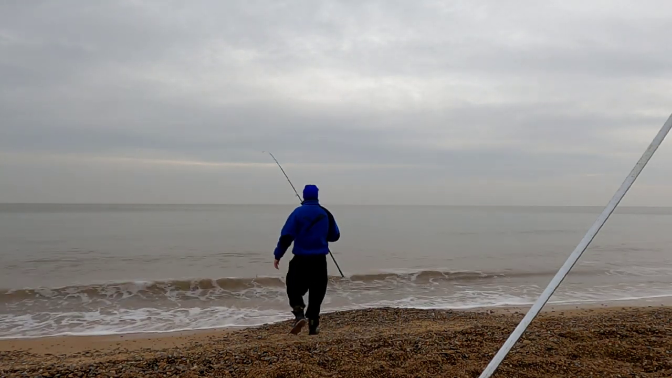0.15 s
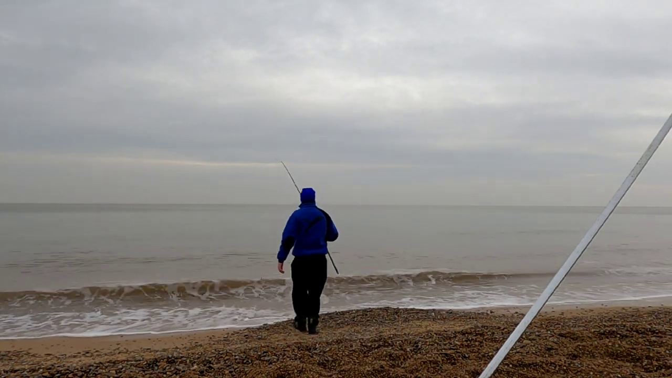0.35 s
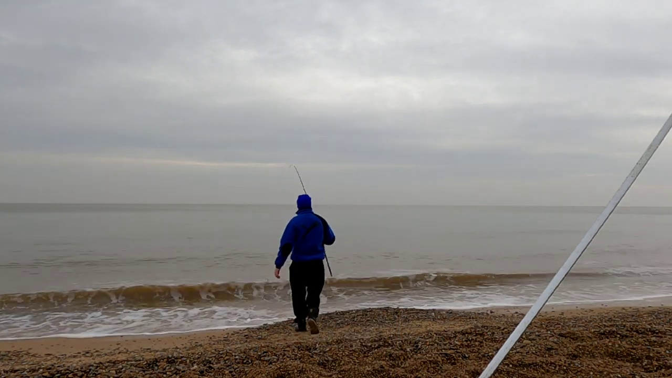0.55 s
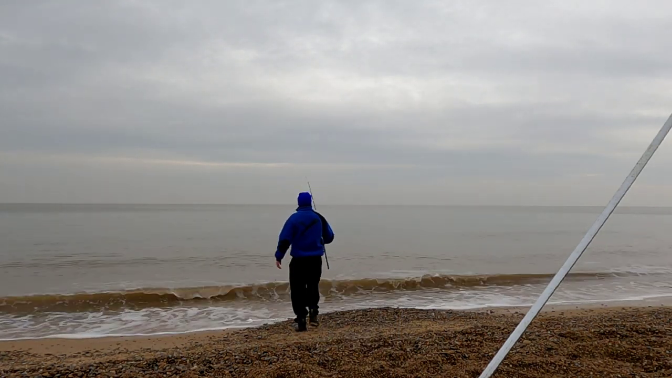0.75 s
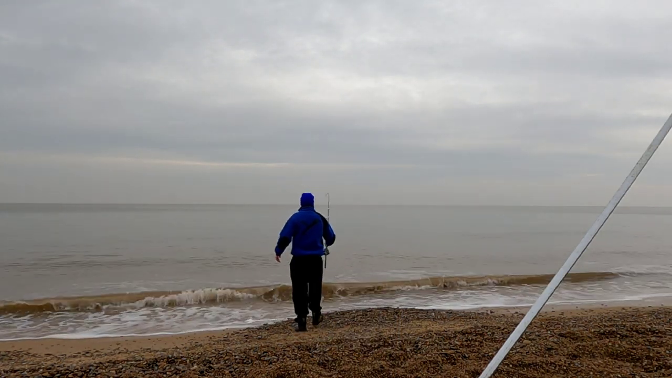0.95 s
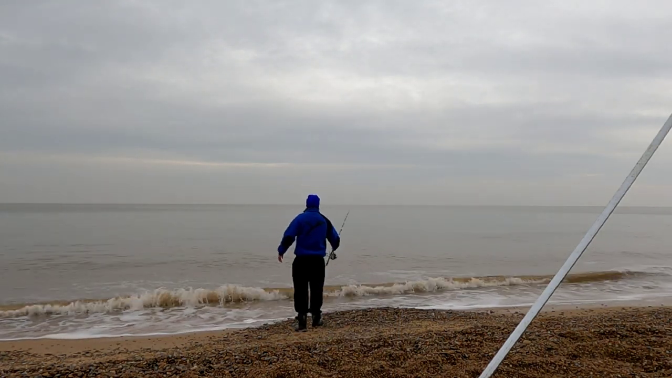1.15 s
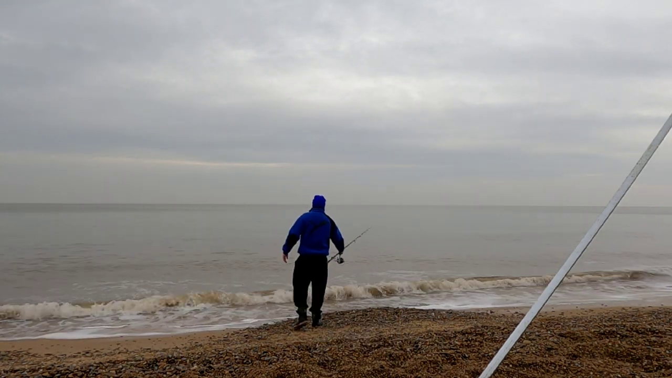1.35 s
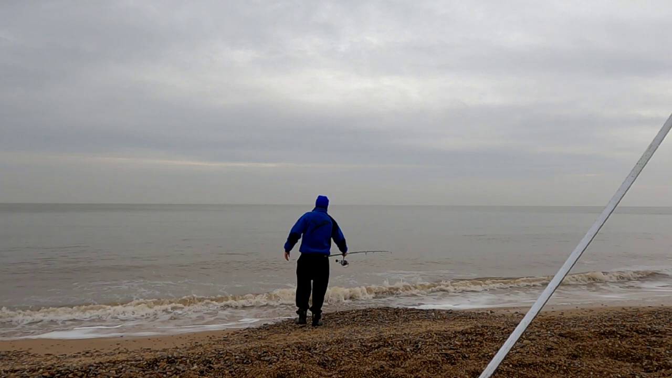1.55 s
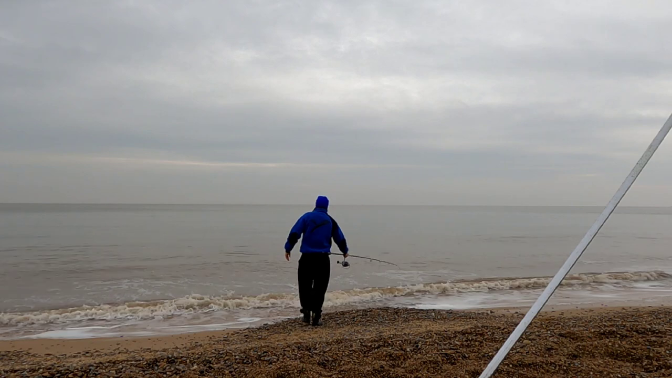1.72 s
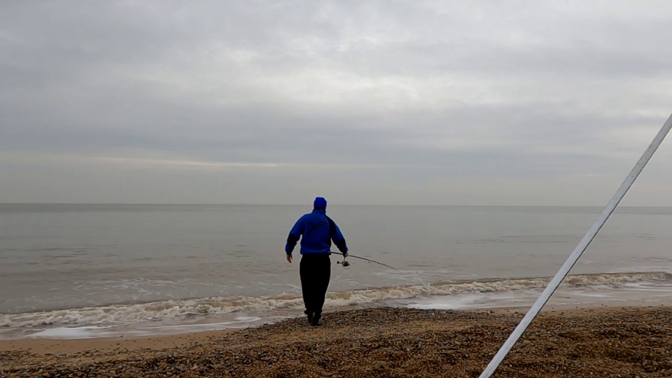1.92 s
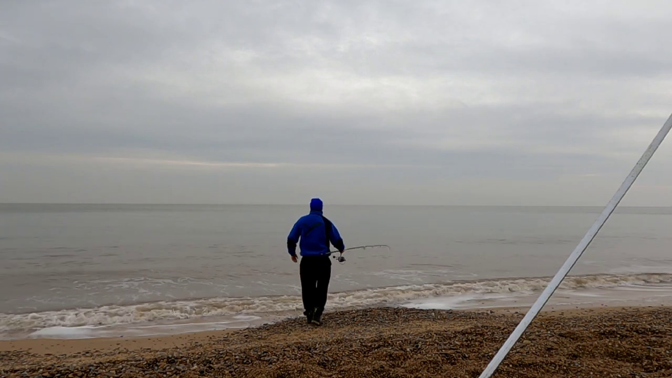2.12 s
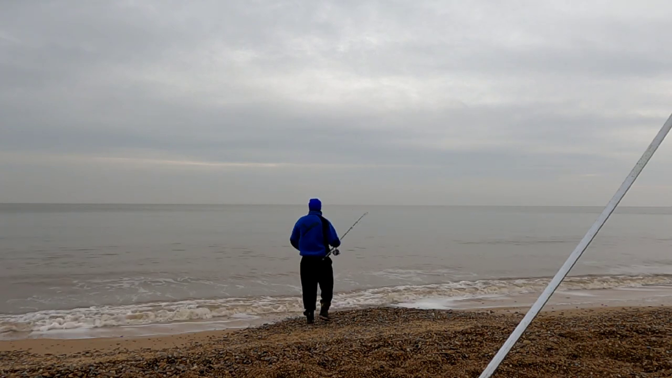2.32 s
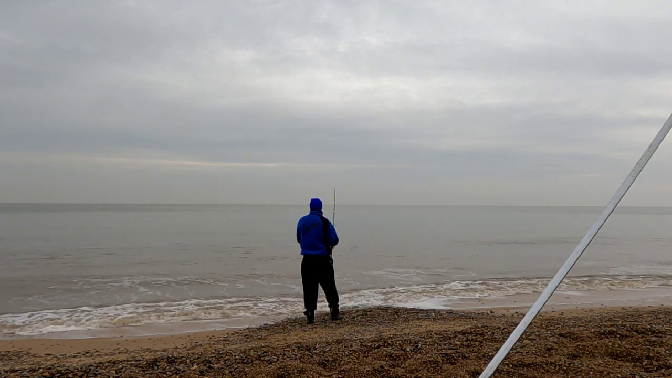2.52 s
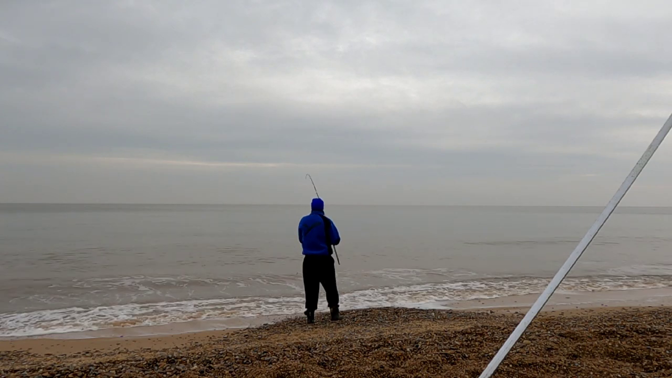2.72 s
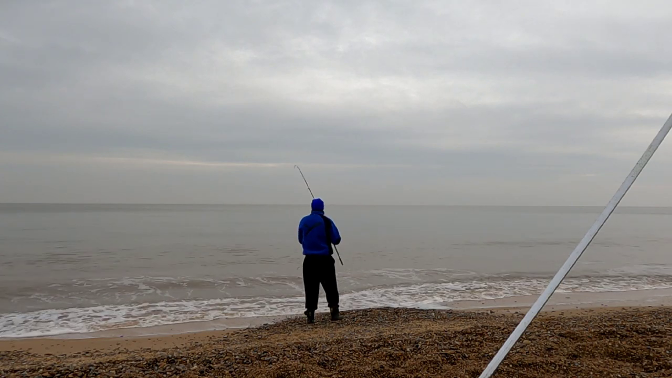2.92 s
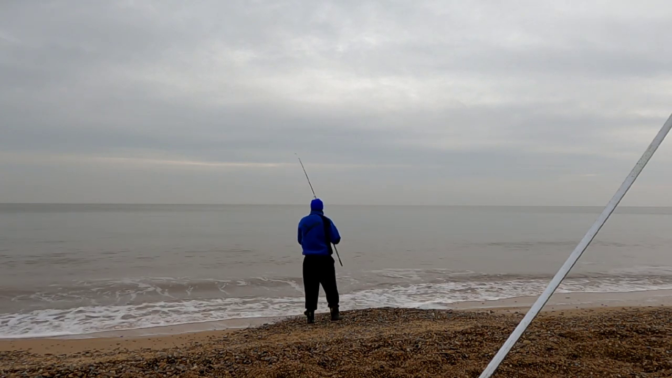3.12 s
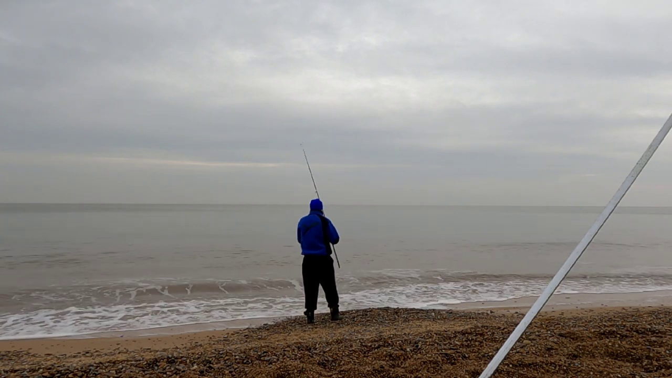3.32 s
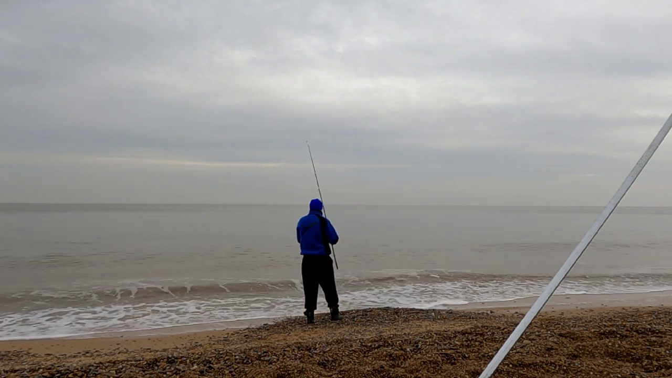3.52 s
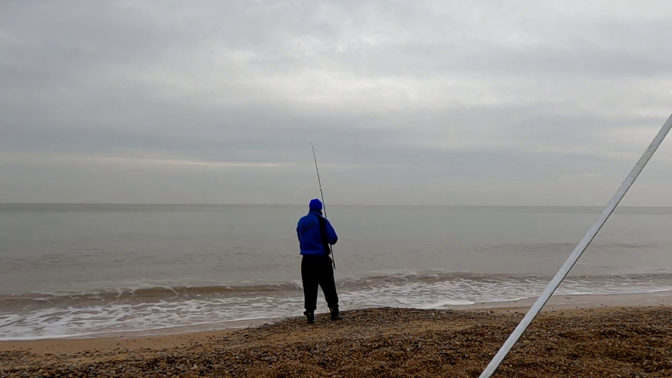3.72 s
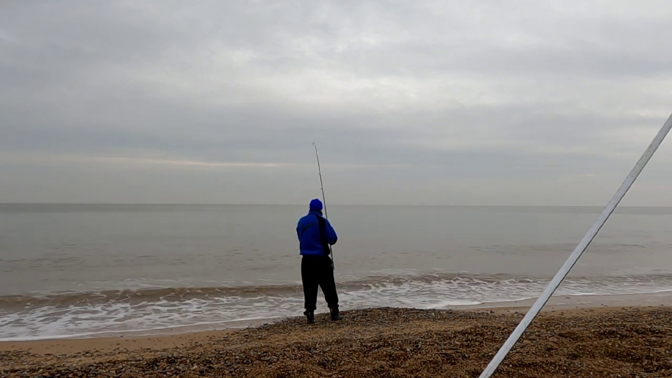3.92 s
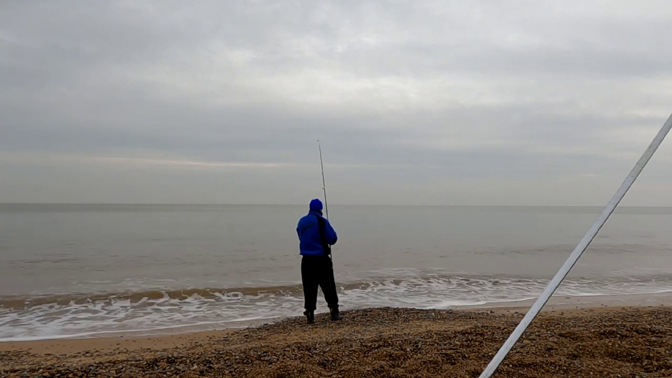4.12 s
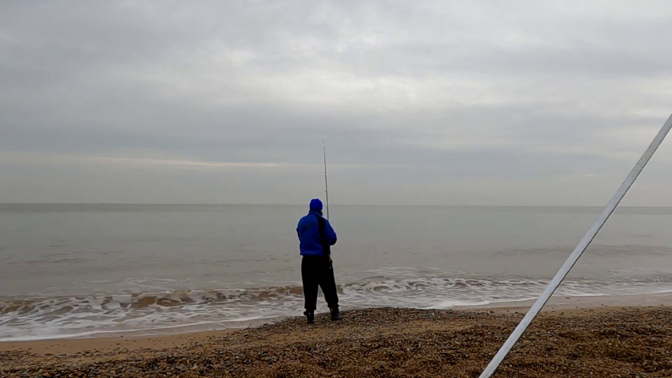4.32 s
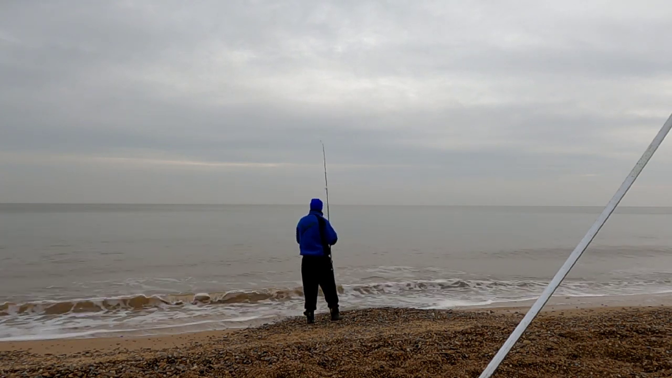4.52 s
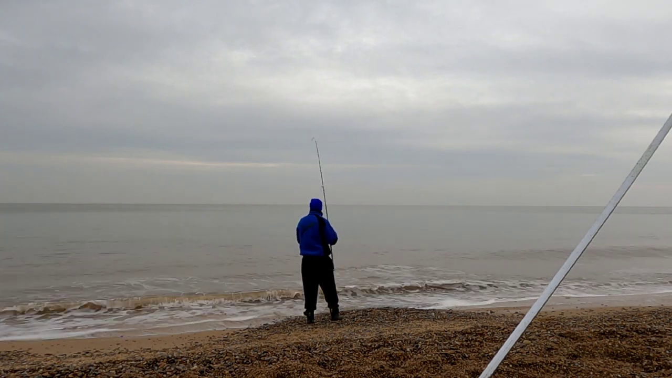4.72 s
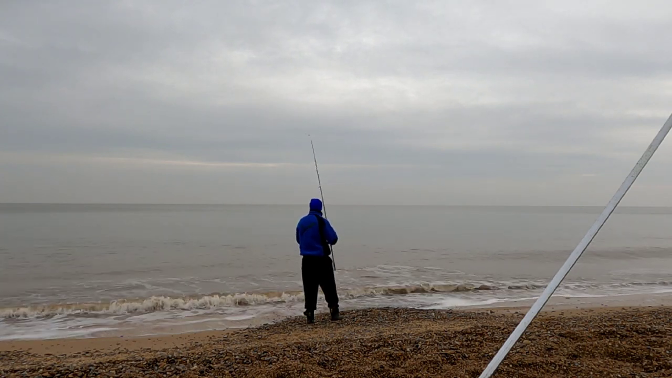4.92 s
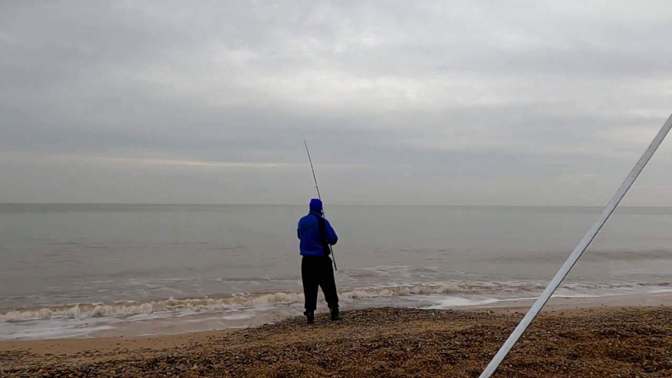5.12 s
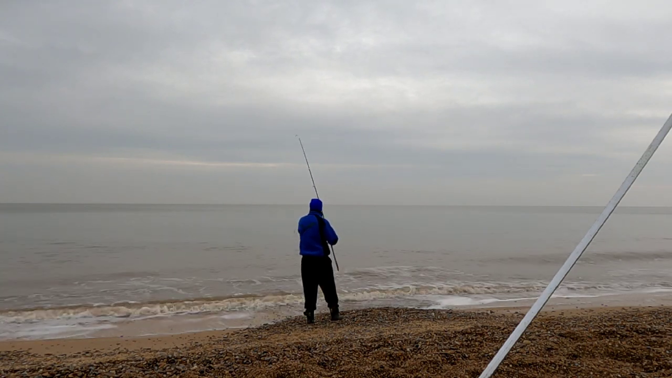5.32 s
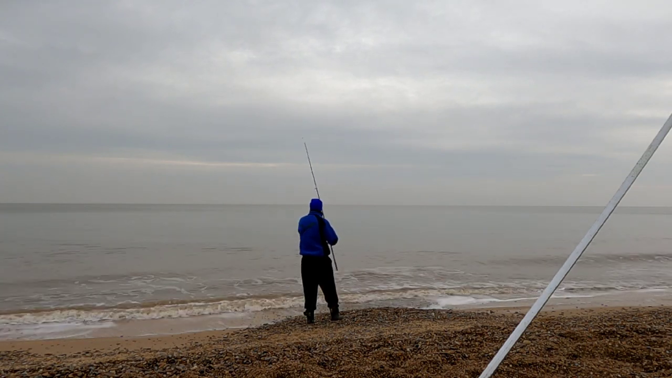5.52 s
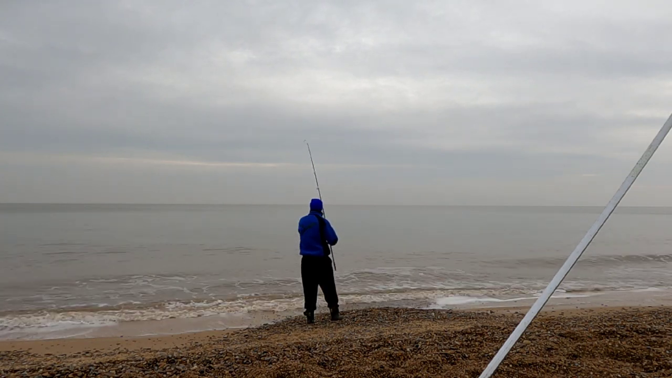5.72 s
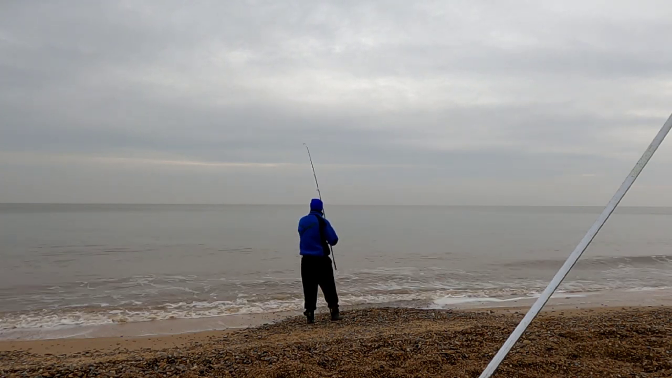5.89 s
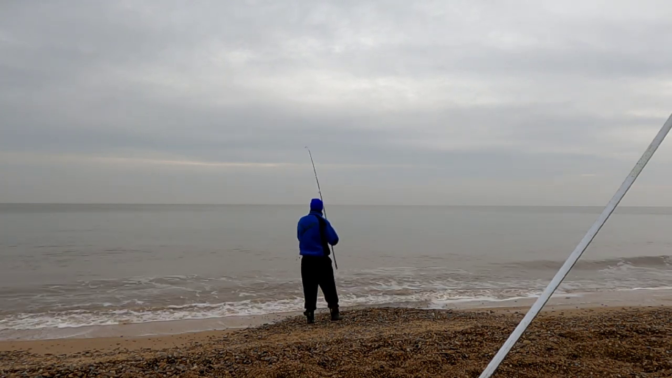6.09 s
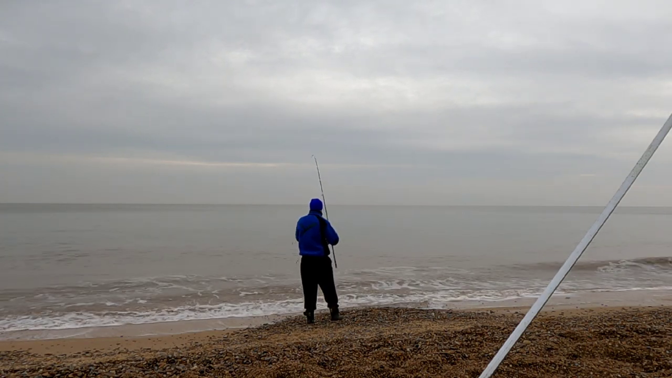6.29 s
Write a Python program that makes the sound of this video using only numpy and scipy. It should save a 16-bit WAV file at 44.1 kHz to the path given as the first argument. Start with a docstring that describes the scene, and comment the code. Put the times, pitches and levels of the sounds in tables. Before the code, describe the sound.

Open shingle beach, close to the waterline, almost mono. Two brief splashes over a faint far wash, then the biggest wave breaks at about one second with a low tumble and broad foamy roar, fading. Foam washes up, a rod swishes briefly, and the water quietens. Smaller crests spill from just before four seconds, strengthening near five, with wind thumps and a sharp pebble knock near the end.

```python
"""Small waves on a shingle beach, 6.35 s, with wind on a nearly mono microphone, over a steady far wash.
Two short spills and a faint wind hum open; near 1 s the largest crest breaks: noise and damped bubble tones
in thud, tumble, foam and spray layers. Foam washes up at 2.5 s and a rod (a burst of bright noise) swishes.
Crests spill again from 3.8 s, a thin hiss sets in at 4 s, and wash and gusts (slow noise swells) close.
Pebbles (short gritty ticks) knock early and late, loudest at 5.9 s; air pockets gulp as rising sine notes."""
import sys
import numpy as np
from scipy.fft import rfft, irfft, next_fast_len
from scipy.io import wavfile
from scipy.ndimage import map_coordinates

SR = 44100
rng = np.random.default_rng(int(sys.argv[2]) if len(sys.argv) > 2 else 0)


def output_pcm(signal):
    """Save a mono or channel-first signal as 16-bit PCM at the path in sys.argv[1].

    Samples are clipped to [-1, 1] before scaling.
    """
    pcm = np.clip(np.atleast_2d(signal).T, -1, 1) * 32767
    wavfile.write(sys.argv[1], SR, np.round(pcm).astype(np.int16))


N = 280035

# Low rumble of wind and of falling water. Each row: frequency in Hz, relative level in dB per Hz.
RUMBLE_SPECTRUM = [(12, -13), (25, -8), (45, -7), (70, 2), (95, -12), (140, -5.5), (400, -38)]
# How a spray-like layer follows a crest: lag in rise times, onset exponent, factor on the fall rate.
SPRAY_FOLLOW = (0, 0.4, 1.21)


def amp(db):
    """Decibels to gain."""
    return 10 ** (np.asarray(db) / 20)


def unit(x):
    """Scale to rms 1."""
    return x / np.sqrt(np.mean(x ** 2) + 1e-20)


def seconds():
    """The time of each sample."""
    return np.arange(N) / SR


def bell(middle_s, half_s):
    """A Gaussian swell up to 1 and back; half_s is its standard deviation."""
    return np.exp(-.5 * ((seconds() - middle_s) / half_s) ** 2)


def wobble(knots_per_s):
    """A smooth random curve through normally distributed knots."""
    knots = rng.standard_normal(int(N * knots_per_s / SR) + 4)
    return map_coordinates(knots, [np.arange(N) * knots_per_s / SR])


def filtered(x, response):
    """x times a response of frequency."""
    size = next_fast_len(N + 8192)  # padded against wrap-around
    spectrum = rfft(x, size) * response(np.fft.rfftfreq(size, 1 / SR))
    return irfft(spectrum, size)[..., :N]


def coloured(x, points):
    """x shaped by (Hz, dB) points joined on a log-frequency axis."""
    point_hz, db = np.transpose(points)
    return filtered(x, lambda hz: amp(np.interp(np.log(hz + 1), np.log(point_hz), db)))


def noise(spectrum):
    """Noise of rms 1 with the given spectrum."""
    return unit(coloured(rng.standard_normal(N), spectrum))


def spill(start_s, rise_s, fall_after_s, fall_db_per_s, follow):
    """One crest's gain in one layer: it builds, holds while the crest breaks along the shore, then dies away."""
    lag, exponent, fall_factor = follow
    age_s = seconds() - start_s
    build = (1 - np.exp(-np.maximum(age_s - lag * rise_s, 0) / rise_s)) ** exponent
    fall_db = fall_factor * fall_db_per_s * np.maximum(age_s - fall_after_s, 0)
    return build * amp(-fall_db)


def side_noise():
    """Faint steady shaped noise, opposite in the two channels."""
    # Each row: frequency in Hz, relative level in dB per Hz.
    side_spectrum = [(60, 2), (300, 4.5), (700, -3.5), (1400, -25), (3000, -17.5), (5000, -1.5),
                     (10000, 3.5), (15000, -3.5)]
    return amp(-81.5) * noise(side_spectrum)


def wind():
    """Slow pressure swells, a low rumble, one brief hum sagging in pitch and a faint steady hiss."""
    # Gusts on the microphone. Each row: middle in seconds, half length in seconds, pressure swell in dB.
    gusts = [(.2, 0.31, -59), (1.12, 0.15, -41.5), (3.872, 0.093, -42), (5.05, 0.052, -56),
             (5.745, 0.1, -36), (6.13, 0.13, -39.5)]
    # Slow pressure noise. Each row: frequency in Hz, relative level in dB per Hz.
    swell_spectrum = [(1, -18), (4, 13), (8, 3), (15, -16), (28, -7.5), (60, -66.5)]
    # Steady hiss. Each row: frequency in Hz, relative level in dB per Hz.
    air_spectrum = [(100, -1), (3000, 1), (8000, -9), (12000, -16), (16000, -19)]
    breeze_db, rumble_db, hiss_db = -50, -69, -61.5
    hum_s, hum_half_s, hum_db, hum_mid_hz, hum_sag_oct_per_s = 0.253, 0.051, -53.5, 78, 0.84

    gust_gain = np.linalg.norm([amp(db) * bell(s, half_s) for s, half_s, db in gusts], axis=0)
    swell = np.hypot(gust_gain, amp(breeze_db)) * noise(swell_spectrum)
    rumble = amp(rumble_db) * noise(RUMBLE_SPECTRUM)

    hum_hz = hum_mid_hz * 2 ** (-hum_sag_oct_per_s * (seconds() - hum_s))
    tone = unit(np.sin(2 * np.pi * np.cumsum(hum_hz) / SR))
    hum = amp(hum_db) * bell(hum_s, hum_half_s) * tone
    return swell + rumble + hum + amp(hiss_db) * noise(air_spectrum)


def thin_hiss():
    """A narrow band of high noise sets in quickly over the low wash and fades slowly."""
    # Each row: frequency in Hz, relative level in dB per Hz.
    thin_spectrum = [(4600, -30), (5700, 0), (6400, 12), (7500, -11), (10000, -32)]
    # fall rate before the spray law's factor
    gain = spill(start_s=4.04, rise_s=.04, fall_after_s=.12, fall_db_per_s=13, follow=SPRAY_FOLLOW)
    return amp(-63) * gain * noise(thin_spectrum)


def rod():
    """An angler's rod cuts the air: short bright noise, its level wobbling fast for a slight rasp."""
    # Each row: frequency in Hz, relative level in dB per Hz.
    rod_spectrum = [(2500, -25), (5000, 12), (8500, 8), (13000, -1), (16000, -7)]
    level_db = -50 + 1.5 * wobble(290)
    return amp(level_db) * bell(2.668, 0.023) * noise(rod_spectrum)


def pebbles():
    """Pebbles knock together: each contact is a very short decaying tone plus grit, band-filtered."""
    # Each row: start in seconds, peak in dB, centre in Hz, band half-width (Gaussian sigma) in octaves,
    # 60 dB decay time in seconds before the band filter.
    knocks = [(.095, -43, 6500, 0.62, 0.012), (.482, -46, 8500, .6, .005), (.899, -47, 11000, .5, .004),
              (.912, -41, 4800, .7, .004), (.936, -37, 7500, 0.7, 0.0055), (4.078, -45, 5630, .4, .005),
              (4.595, -37.5, 4800, .5, 0.0034), (5.8564, -21.5, 2070, 1, 0.0042),
              (6.022, -39, 5540, 0.68, .005)]
    out = np.zeros(N + SR)
    t = np.arange(SR // 20) / SR
    hz = np.fft.rfftfreq(len(t), 1 / SR) + 1
    lead = SR // 200  # room for the filter's pre-ringing
    for s, db, centre_hz, octaves, t60_s in knocks:
        grit = rng.standard_normal(len(t))
        contact = (np.sin(2 * np.pi * centre_hz * t) + grit) * amp(-60 * t / t60_s)
        band = np.exp(-.5 * (np.log2(hz / centre_hz) / octaves) ** 2)
        tick = irfft(rfft(np.roll(contact, lead)) * band, len(t))
        out[round(s * SR) - lead:][:len(t)] += amp(db) * tick / np.abs(tick).max()
    return out[:N]


def gulps():
    """An air pocket closing under a curling crest swells into a low note and dies away, rising a little."""
    # Each row: start in seconds, envelope peak in dB, starting pitch in Hz, 60 dB decay time in seconds.
    pockets = [(0.988, -58, 134, 0.19), (1.102, -52, 63.3, 0.26), (4.745, -46, 185, 0.096)]
    out = np.zeros(N + SR)
    t = np.arange(SR // 2) / SR
    for s, db, hz, t60_s in pockets:
        envelope = (1 - np.exp(-t / 0.012)) ** 2 * amp(-60 * t / t60_s)
        note = np.sin(2 * np.pi * hz * t * (1 + 0.049 * t / t60_s))
        out[round(s * SR):][:len(t)] += amp(db) * envelope / envelope.max() * note
    return out[:N]


def bubbles(low_hz, high_hz, cycles, spread_db, glide, count, size):
    """A cloud of short damped tones of random pitch and strength, each rising in pitch as it dies."""
    when, pitch, strength, sign = rng.random((count, 4)).T[:, :, None]
    hz = low_hz * (high_hz / low_hz) ** pitch
    turns = hz * np.arange(size) / SR
    age = turns / cycles
    loudness = amp(-spread_db * np.log(np.maximum(strength, .01)))
    ring = np.exp(-2 * age) * np.sin(2 * np.pi * turns * (1 + glide * age))
    signed_rings = np.sign(sign - .5) * loudness * ring
    where = (when * N).astype(int) + np.arange(size)
    return unit(np.bincount(where.ravel(), signed_rings.ravel(), N)[:N])


def water(spectrum, grains, grain_db, churn_db, churn_rate):
    """Single grains over the blur of countless smaller ones, surging unevenly."""
    mix = rng.standard_normal(N) + amp(grain_db) * grains
    return unit(coloured(mix, spectrum) * amp(churn_db * wobble(churn_rate)))


def surf_gains():
    """Per crest, spray leads, then foam, thud, tumble; thud falls fastest, foam slowest; powers add."""
    # Crests spilling over. Each row: start in seconds, rise in seconds, seconds from start to fall,
    # fall in dB per second before the layer's factor, then foam, tumble, spray and thud levels in dB.
    breakers = [(0.068, 0.017, 0.054, 56, -60.5, -52, -58, -65),
                (.47, 0.034, 0.2, 49, -66, -58.5, -65, -77),
                (0.949, 0.2, 0.62, 12.5, -37, -36, -44.5, -51.5),
                (3.823, 0.017, 0.33, 9, -57.5, -51.5, -82, -66.5),
                (4.083, 0.054, 0.61, 5, -53.5, -50, -82, -70),
                (4.67, 0.047, 0.26, 16, -45, -52.5, -60.5, -63),
                (4.827, 0.11, .5, 19.5, -41.5, -42, -53, -61.5)]
    # Foam sheets over the stones. Each row: middle in seconds, half length in seconds, foam dB, spray dB.
    swashes = [(0.278, 0.028, -62, -62), (0.923, 0.041, -63, -69), (2.484, 0.24, -46.5, -60),
               (3.28, 0.2, -55, -82), (5.78, 0.25, -48, -56.5)]
    # Water sinks into the shingle. Each row: middle in seconds, half length in seconds, depth in dB.
    lulls = [(0.384, 0.072, 7.5), (3.718, 0.26, 3), (6.25, 0.26, 4)]
    # How each layer follows a crest: lag in rise times, onset exponent, factor on the fall rate.
    foam_follow = (0.043, 0.85, 0.77)
    tumble_follow = (.45, 1.76, 1.185)
    thud_follow = (0.38, 1.0, 1.45)
    far_tumble_db, far_foam_db, far_spray_db, far_thud_db = -61.5, -65.5, -64.5, -78  # steady shoreline

    tumble, foam, spray, thud = [], [], [], []
    for *shape, foam_db, tumble_db, spray_db, thud_db in breakers:
        tumble.append(amp(tumble_db) * spill(*shape, tumble_follow))
        foam.append(amp(foam_db) * spill(*shape, foam_follow))
        spray.append(amp(spray_db) * spill(*shape, SPRAY_FOLLOW))
        thud.append(amp(thud_db) * spill(*shape, thud_follow))
    for s, half_s, foam_db, spray_db in swashes:
        foam.append(amp(foam_db) * bell(s, half_s))
        spray.append(amp(spray_db) * bell(s, half_s))
    drain = amp(-sum(db * bell(s, half_s) for s, half_s, db in lulls))
    layers = [(tumble, far_tumble_db), (foam, far_foam_db), (spray, far_spray_db), (thud, far_thud_db)]
    return [drain * np.hypot(np.linalg.norm(near, axis=0), amp(far_db)) for near, far_db in layers]


def surf():
    """Falling water thuds, trapped air rings low, foam seethes mid, drops and rolling stones crackle on top."""
    # Layer spectra. Each row: frequency in Hz, relative level in dB per Hz.
    tumble_spectrum = [(40, -29), (100, -1), (140, -5), (220, -3), (330, 2.5), (600, 7.5), (1000, 3.5),
                       (1800, -1.5), (3500, -20), (9000, -53)]
    foam_spectrum = [(150, -41), (450, -8), (1000, -1), (2000, 0), (3300, -1.5), (5500, -10), (9000, -25),
                     (16000, -38)]
    spray_spectrum = [(1000, -9), (3000, 0.5), (5300, 0.5), (8200, -4.5), (10500, -14.5), (13000, -20),
                      (16000, -33)]
    tumble_gain, foam_gain, spray_gain, thud_gain = surf_gains()
    spray_gain = amp(4.0) * spray_gain  # lifts all spray levels

    pockets = bubbles(163.6, 1535, cycles=6.8, spread_db=1.5, glide=0.043, count=2600, size=1600)
    froth = bubbles(733, 4350, cycles=5.1, spread_db=0.5, glide=0.017, count=7000, size=380)
    drops = bubbles(2940, 15000, cycles=3.9, spread_db=3.5, glide=0.016, count=12000, size=60)

    tumble = tumble_gain * water(tumble_spectrum, pockets, grain_db=-12, churn_db=0.87, churn_rate=25)
    foam = foam_gain * water(foam_spectrum, froth, grain_db=-8, churn_db=.5, churn_rate=24)
    spray = spray_gain * water(spray_spectrum, drops, grain_db=-8.0, churn_db=0.9, churn_rate=35)
    thud = thud_gain * noise(RUMBLE_SPECTRUM)
    return (thud + tumble + foam + spray) * amp(0.22 * wobble(14))


def scene():
    """The shore is alike in both channels; a faint steady noise is added with opposite sign."""
    mid = wind() + thin_hiss() + rod() + pebbles() + gulps() + surf()
    side = side_noise()
    return np.array([mid + side, mid - side])


def record(dry):
    """The microphone housing notches the treble; nothing is kept above the band limit."""
    # Each row: frequency in Hz, gain in dB.
    housing_response = [(2500, 0.5), (3300, 0), (3650, -3), (4050, -10.5), (4600, -4.5), (5400, 0),
                        (5950, -1), (6600, -8.5), (7300, -3.5), (8200, -1.5)]
    top_hz = 15600
    return filtered(coloured(dry, housing_response), lambda hz: hz < top_hz)


dry = scene()
out = record(dry)
output_pcm(out)
```